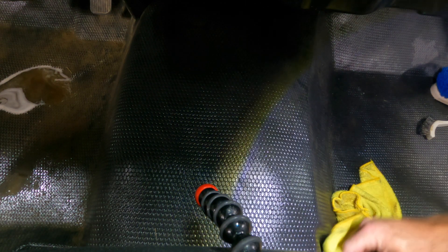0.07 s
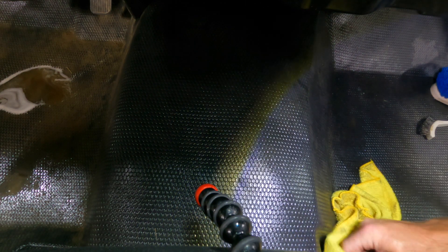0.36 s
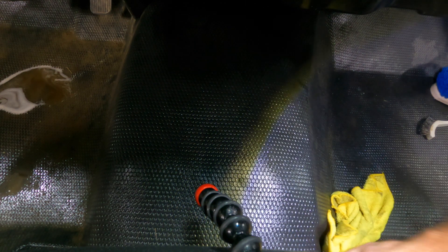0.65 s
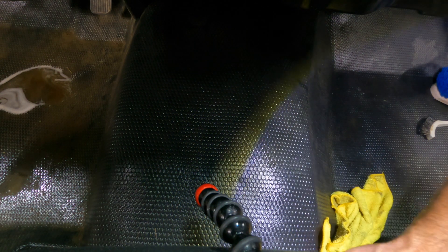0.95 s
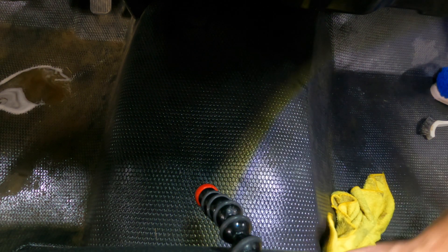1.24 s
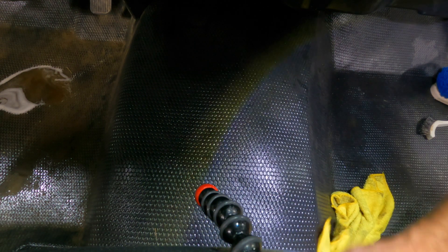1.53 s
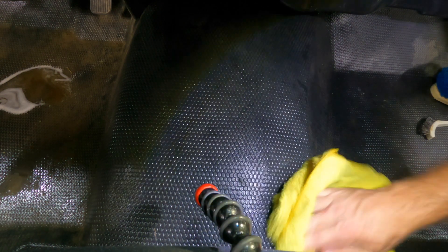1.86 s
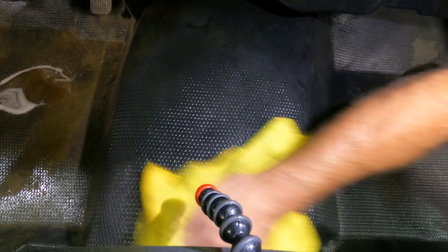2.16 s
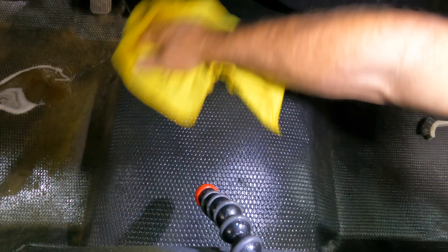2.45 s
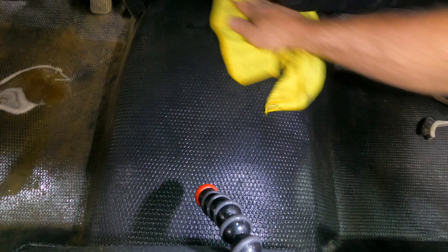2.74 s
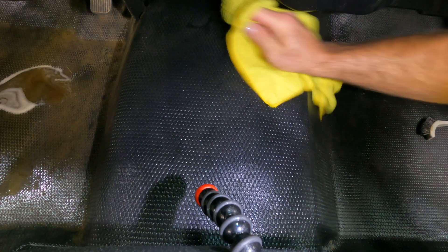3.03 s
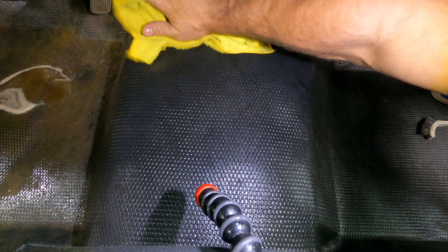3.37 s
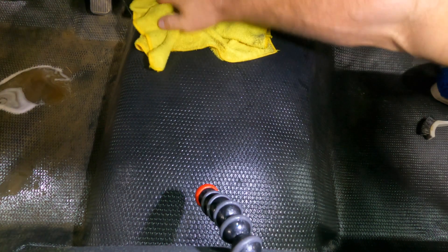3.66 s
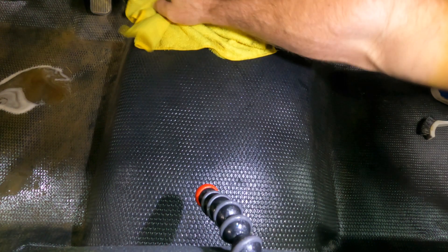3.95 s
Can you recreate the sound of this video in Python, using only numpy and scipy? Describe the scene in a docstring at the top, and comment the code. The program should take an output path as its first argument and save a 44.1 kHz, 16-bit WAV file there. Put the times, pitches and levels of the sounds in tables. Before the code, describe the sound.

Steady motor drone and hissing air from a nearby machine fill a vehicle cabin, topped by a high whine. Later a hand bumps the floor and a cloth rubs the rubber mat, scuffing most near the end.

```python
"""Inside a vehicle, a machine runs steadily close by: its motor drones, its blower whines, air hisses.
A cloth wipes the rubber floor mat, sliding softly and catching in short scuffs, most near the end.
The hand's pats and bumps ring the floor panel, and the body booms low as weight shifts.
The reaching arm shades the top of the hiss a little."""
import sys
import numpy as np
from scipy import signal
from scipy.fft import rfft, irfft, next_fast_len
from scipy.io import wavfile
from scipy.ndimage import uniform_filter1d, map_coordinates

SR = 44100
rng = np.random.default_rng(int(sys.argv[2]) if len(sys.argv) > 2 else 0)


def wrap_up_sound(samples):
    """Save the sound to the file named by the first command line argument, as 16-bit audio."""
    columns = np.atleast_2d(samples).T
    # keep every value between -1 and 1, then stretch to whole-number steps
    tamed = np.clip(columns, -1, 1)
    steps = np.round(tamed * 32767).astype(np.int16)
    wavfile.write(sys.argv[1], SR, steps)


N = 4 * SR

# Motor hum (shaft order [-], level [dB])
SHAFT_ORDERS = [(1, -35), (2, -22.5), (3, -33), (4, -40), (5, -42.5), (6, -42.5), (7, -52), (8, -58.5),
                (10, -52), (11, -55), (12, -59), (13, -62.5), (19, -55)]
# Rumble and air spectra (frequency [Hz], relative density [dB])
RUMBLE_SPECTRUM = [(15, -36), (34, -23), (50, 3), (100, -6.5), (140, -2.5), (180, 0), (225, -6), (285, -8),
                   (330, -18.5), (400, -27.5), (600, -48), (1500, -76)]
AIR_SPECTRUM = [(100, -49), (350, -5.5), (500, -1), (565, -7.5), (650, 2.5), (900, 2.5), (1020, -1.5),
                (1340, -1), (1560, 0.5), (1850, -2), (2700, -4.5), (3400, -7), (5000, -16), (9000, -58)]
SHAFT_HZ, SPEED_DRIFT, ORDER_WAVER_DB = 41.6, 0.002, 0.49
MAINS_HZ, MAINS_DB = 60.45, -33
RUMBLE_DB, RUMBLE_THROB = -33, 0.21
AIR_DB, AIR_THROB = -35.5, 0.043


def motor():
    """Shaft orders and mains hum, with rumble and air noise that throb once a turn."""
    shaft = angle(SHAFT_HZ * (1 + SPEED_DRIFT * wobble(4.2)))
    hum = 0
    for order, db in SHAFT_ORDERS:
        gain = amp(db + ORDER_WAVER_DB * wobble(6.96))
        hum += gain * np.sin(order * shaft + 2 * np.pi * rng.random())
    hum += amp(MAINS_DB) * np.sin(angle(np.full(N, MAINS_HZ)))
    rumble = unit(rush(RUMBLE_SPECTRUM, patchy_db=1.5) * (1 + RUMBLE_THROB * np.sin(shaft)))
    air = rush(AIR_SPECTRUM, patchy_db=2.0) * (1 + AIR_THROB * np.sin(shaft))
    return np.sqrt(2) * hum + amp(RUMBLE_DB) * rumble + amp(AIR_DB) * air


# Whine pitch (time [s], frequency [Hz])
WHINE_PITCH = [(0, 2103), (.6, 2108), (1, 2104), (1.8, 2113), (2.3, 2111), (2.7, 2103), (3.2, 2106)]
# Whine level (time [s], level before trim [dB], left minus right [dB])
WHINE_LEVEL = [(0, -40.5, 3), (.25, -38, 5.5), (.65, -40, 2), (.98, -45, 18), (1.17, -39.5, 6),
               (1.65, -36.5, 3.5), (1.95, -38, 6), (2.38, -43, 4), (2.55, -38, 10), (2.67, -42.5, 11),
               (2.93, -33, 5.5), (3.1, -35, 7), (3.48, -42, 9)]
# Housing tones (frequency [Hz], level [dB])
HOUSING_TONES = [(353, -54.5), (900, -55.5), (1080, -59.5), (1420, -51.5), (1650, -53.5), (1692, -52),
                 (1945, -54)]
WHINE_TRIM_DB, WHINE_WAVER_DB, WHINE_JITTER_HZ = 2, 0.92, 2.14
HOUSING_WAVER_DB, HOUSING_JITTER = 3.64, 0.0061


def blower():
    """One clear whine that shifts between the ears, over faint fluttering housing tones."""
    pitch_hz, = curves(WHINE_PITCH)
    level_db, pan_db = curves(WHINE_LEVEL)
    sides = unit(amp(np.outer([.5, -.5], pan_db)))
    whine_gain = amp(level_db + WHINE_TRIM_DB + WHINE_WAVER_DB * wobble(24.98))
    whine = whine_gain * np.sin(angle(pitch_hz + WHINE_JITTER_HZ * wobble(40)))
    housing = 0
    for hz, db in HOUSING_TONES:
        gain = amp(db + HOUSING_WAVER_DB * wobble(12))
        housing += gain * np.sin(angle(hz * (1 + HOUSING_JITTER * wobble(60))))
    return np.sqrt(2) * (whine * sides / sides.mean(0) + housing)


# Hiss spectrum (frequency [Hz], relative density [dB])
HISS_SPECTRUM = [(1500, -10), (3300, -7), (4000, 0.5), (4800, -1.5), (5600, 1), (6800, -1.5), (7500, -1.5),
                 (8300, -3), (9500, -10), (10700, -13.5), (12000, -11), (13200, -15.5), (14500, -31)]
# Upper air resonance (time [s], centre [Hz], level before trim [dB])
HIGH_RING = [(0, 6277, -36), (.45, 6270, -32.5), (.95, 6214, -36.5), (1.3, 6225, -34), (1.8, 6175, -35),
             (2.28, 6020, -38), (2.47, 6216, -36), (3, 6205, -33.5), (3.42, 6220, -36.5), (4, 6250, -35.5)]
# Lower air resonance (time [s], level before trim [dB])
LOW_RING = [(0, -39.5), (1.5, -50), (2.35, -44), (2.54, -35), (3, -42.5), (3.27, -37), (3.7, -43)]
# Steady duct resonances (centre [Hz], width [Hz], level [dB])
DUCT_MODES = [(909, 19, -51.5), (1620, 115, -44.5), (7310, 110, -47.5)]
# Arm shading of the treble (time [s], gain [dB])
ARM_SHADE = [(1.7, 0), (3.6, -2)]
HIGH_WIDTH_HZ, HIGH_TRIM_DB = 520, 0.5
LOW_HZ, LOW_WIDTH_HZ, LOW_TRIM_DB = 4250, 300, -1
ARM_SHADE_HZ = 7500


def hiss():
    """Broad air hiss, its top shaded by the arm, with duct resonances and two swelling rings."""
    high_hz, high_db = curves(HIGH_RING)
    low_db, = curves(LOW_RING)
    shade_db, = curves(ARM_SHADE)
    high = amp(high_db + HIGH_TRIM_DB + 0.47 * wobble(18)) * ring(high_hz, HIGH_WIDTH_HZ)
    low = amp(low_db + LOW_TRIM_DB + 0.78 * wobble(22)) * ring(LOW_HZ, LOW_WIDTH_HZ)
    ducts = sum(amp(db) * ring(hz, width_hz) for hz, width_hz, db in DUCT_MODES)
    broad = amp(db=-34.5) * rush(HISS_SPECTRUM, patchy_db=2.67)
    top = filtered(broad, lambda hz: 1 - 1 / (1 + (hz / ARM_SHADE_HZ) ** 6))
    return broad + (amp(shade_db) - 1) * top + high + low + ducts


def ring(centre_hz, width_hz):
    """Half-whistling air noise in one resonance, whose centre may move."""
    mean_hz = np.mean(centre_hz)
    band = filtered(patchy(depth_db=4), lambda hz: 1 / (1 + ((hz - mean_hz) / width_hz) ** 2) ** 2)
    shift = np.exp(1j * angle(centre_hz - np.full(N, mean_hz)))
    return spread(np.real(signal.hilbert(band) * shift))


# Long wipes (start [s], length [s], crest level [dB])
WIPES = [(1.845, 0.36, -41.5), (2.185, 0.5, -36), (3.154, 0.16, -38.5), (3.425, 0.6, -40)]
# Scuffs (start [s], length [s], crest level [dB], rasp resonance [Hz])
SCUFFS = [(2.548, 0.018, -25.5, 1700), (3.461, 0.028, -30, 1500), (3.504, 0.055, -28.5, 1400),
          (3.517, 0.025, -23.5, 2190), (3.665, 0.024, -28.5, 1710), (3.738, 0.051, -24, 850),
          (3.737, 0.011, -20, 2400), (3.85, 0.016, -29.5, 1800), (3.892, 0.03, -24.5, 2300),
          (3.918, 0.014, -24, 2300)]
# Friction spectra (frequency [Hz], relative density [dB])
WIPE_SPECTRUM = [(100, -35), (340, 2), (500, -2.5), (700, -7.5), (1200, -12), (3000, -18), (8000, -35)]
SCUFF_SPECTRUM = [(100, -7), (300, -5), (1000, -2), (2700, 0.5), (5000, -3), (15000, -14)]
WIPE_GRAIN_DB, SCUFF_GRAIN_DB = 2.8, 3.5


def cloth():
    """The cloth slides softly over the ribbed mat and catches in short grainy scuffs."""
    strokes = sum(amp(db) * swell(start_s, length_s) for start_s, length_s, db in WIPES)
    out = rush(WIPE_SPECTRUM, patchy_db=3.5) * amp(WIPE_GRAIN_DB * wobble(45)) * strokes
    grain = rush(SCUFF_SPECTRUM, patchy_db=3.0) * amp(SCUFF_GRAIN_DB * wobble(500))
    for start_s, length_s, db, rasp_hz in SCUFFS:
        pressure = swell(start_s, length_s) ** 2
        rasp = filtered(grain, lambda hz: 1 / (1 - (hz / rasp_hz) ** 2 + 1j * hz / rasp_hz))
        out += amp(db) * pressure.std() * unit(pressure * rasp)
    return out


# Hand bumps (time [s], gain [dB], softness cut-off [Hz])
BUMPS = [(1.909, -15, 360), (1.957, -18.5, 360), (2.552, -26.5, 1600), (3.535, -17, 554),
         (3.743, -14, 1200), (3.749, -17, 900), (3.763, -20, 900), (3.924, -19.5, 1000)]
# Floor panel modes (frequency [Hz], relative level [dB], T60 [s])
PANEL_MODES = [(174, -3.5, 0.074), (292.5, -3, 0.057), (343, -10, 0.088), (525, -2, 0.051), (648, 0, 0.046),
               (940, 1, 0.022), (1020, 1.5, 0.046)]
BUMP_ATTACK_S, MODE_SCATTER_DB = 0.0018, 2.2


def floor_bumps():
    """Padded bumps of the hand ring the damped floor panel."""
    out = np.zeros(N + SR)
    t = np.arange(SR // 5) / SR
    attack = 1 - np.exp(-t / BUMP_ATTACK_S)
    for start_s, db, soft_hz in BUMPS:
        modes = 0
        for hz, mode_db, t60_s in PANEL_MODES:
            sign = rng.choice([-1, 1])
            decay = amp(mode_db + rng.normal(0, MODE_SCATTER_DB) - 60 * t / t60_s)
            modes += sign * decay * np.sin(2 * np.pi * hz * t) / (1 + (hz / soft_hz) ** 4)
        out[round(start_s * SR):][:len(t)] += amp(db) * modes * attack
    return out[:N]


# Body booms (start [s], length [s], peak level [dB])
BOOMS = [(1.242, 0.22, -26), (1.87, .18, -25)]
BOOM_HZ, BOOM_DRIFT_HZ = 34.8, 2


def body_booms():
    """Shifting weight makes the vehicle body boom."""
    envelope = sum(amp(db) * swell(start_s, length_s) ** 2 for start_s, length_s, db in BOOMS)
    return envelope * np.sin(angle(BOOM_HZ + BOOM_DRIFT_HZ * wobble(10.1)))


# Cabin field: ear likeness (frequency [Hz], correlation [-])
EAR_LIKENESS = [(200, 1), (450, 0.78), (900, 0.72), (2400, 0.52), (6200, 0.74), (10300, 0.84),
                (12500, 0.48)]
# Ear balance (frequency [Hz], left minus right [dB])
EAR_BALANCE = [(350, -1.5), (800, 3), (2500, 2.5), (3800, -1), (6200, -1.5), (8000, 1.5), (10500, -0.5),
               (12000, 3), (14000, -1)]
# Right-ear lead (frequency [Hz], phase [rad])
EAR_LEAD = [(700, 0.046), (1500, 0.15), (2400, 1), (3400, 0.67), (5000, 0.11)]
MONO_HZ = 170


def spread(pair):
    """Two unrelated noises become the cabin's stereo field, rms 1, with mono bass."""
    def mid_side(hz):
        turn = np.arccos(np.clip(along(EAR_LIKENESS, hz), -1, 1)) / 2
        return np.array([np.cos(turn), np.sin(turn)])

    def ears(hz):
        balance = amp(np.outer([.5, -.5], along(EAR_BALANCE, hz)))
        return balance * np.exp(1j * np.outer([-.5, .5], along(EAR_LEAD, hz)))

    mid, side = filtered(pair, mid_side)
    both = filtered(np.array([mid + side, mid - side]), ears)
    centre = both.mean(0)
    width = filtered(both - centre, lambda hz: hz ** 2 / (hz ** 2 + MONO_HZ ** 2))
    return unit(centre + width)


def rush(spectrum, patchy_db):
    """Stereo noise of a given colour, rms 1."""
    return spread(filtered(patchy(patchy_db), lambda hz: amp(along(spectrum, hz))))


def patchy(depth_db):
    """Two unrelated noises with gain patches in time and frequency."""
    spectra = signal.stft(rng.standard_normal((2, N)), nperseg=1024)[2]
    patches = uniform_filter1d(rng.standard_normal(spectra.shape[1:]), size=2, axis=0)
    patches = uniform_filter1d(patches, size=24, axis=1)
    return signal.istft(spectra * amp(depth_db * unit(patches)), nperseg=1024)[1][:, :N]


def amp(db):
    """Decibels to gain."""
    return 10 ** (np.asarray(db) / 20)


def unit(x):
    """Scale to rms 1."""
    return x / np.sqrt(np.mean(x ** 2) + 1e-20)


def clock():
    """Sample times in seconds."""
    return np.arange(N) / SR


def along(points, hz):
    """Interpolate points on a log frequency axis."""
    knots_hz, values = np.transpose(points)
    return np.interp(np.log(hz + 1), np.log(knots_hz + 1), values)


def curves(rows):
    """One value per sample for each column after the time."""
    times_s, *columns = np.transpose(rows)
    return [np.interp(clock(), times_s, column) for column in columns]


def wobble(rate_hz):
    """Smooth random curve, rate_hz knots a second."""
    return map_coordinates(rng.standard_normal(int(N * rate_hz / SR) + 4), [clock() * rate_hz])


def angle(hz):
    """Running phase from a random start."""
    return 2 * np.pi * (np.cumsum(hz) / SR + rng.random())


def swell(start_s, length_s):
    """Rounded rise and fall."""
    progress = np.clip((clock() - start_s) / length_s, 0, 1)
    return np.sqrt(np.abs(np.sin(np.pi * progress)))


def filtered(x, response):
    """Apply a frequency response."""
    size = next_fast_len(N + SR // 4)
    return irfft(rfft(x, size) * response(np.fft.rfftfreq(size, 1 / SR)), size)[..., :N]


def scene():
    """The machine and the wiping together."""
    return motor() + blower() + hiss() + cloth() + floor_bumps() + body_booms()


def record(dry, top_hz=14700):
    """Brick-wall low-pass."""
    return filtered(dry, lambda hz: hz < top_hz)


dry = scene()
out = record(dry)
wrap_up_sound(out)
```